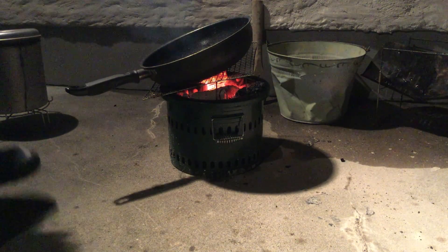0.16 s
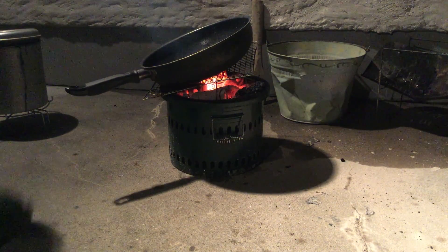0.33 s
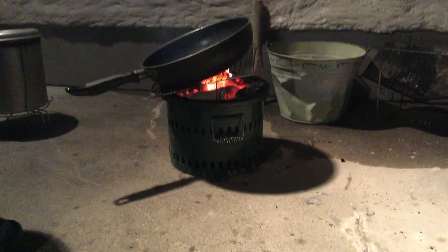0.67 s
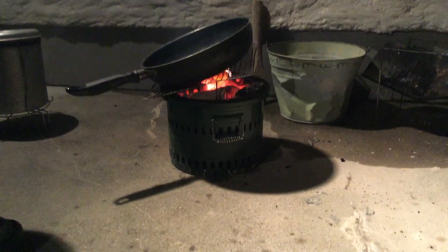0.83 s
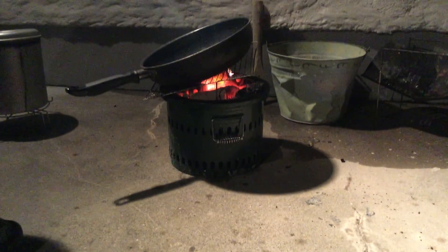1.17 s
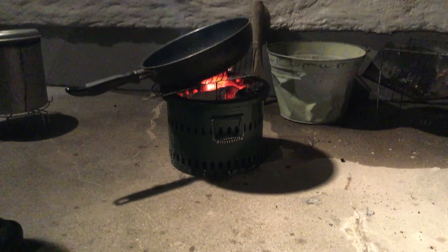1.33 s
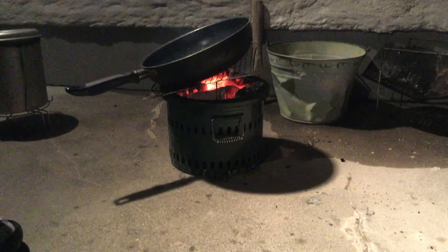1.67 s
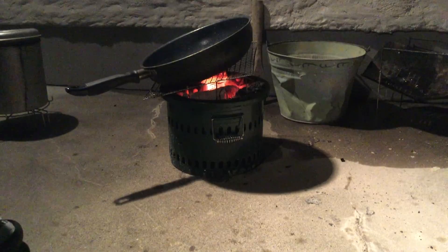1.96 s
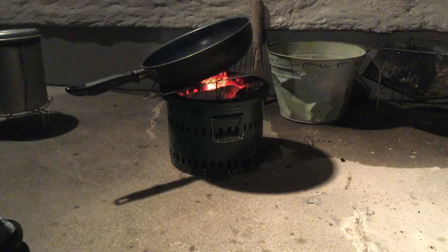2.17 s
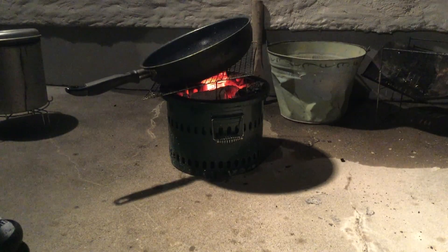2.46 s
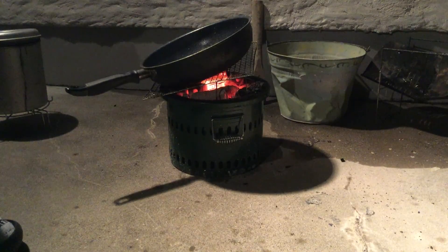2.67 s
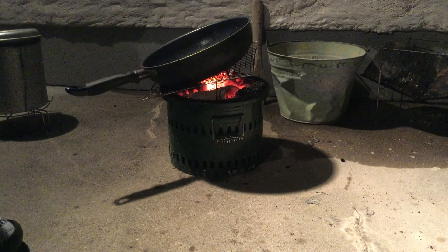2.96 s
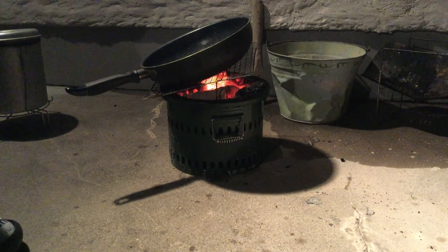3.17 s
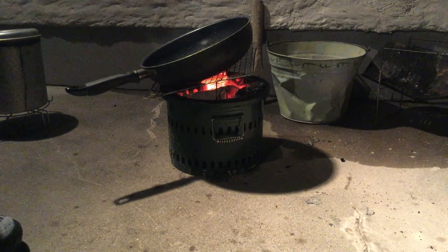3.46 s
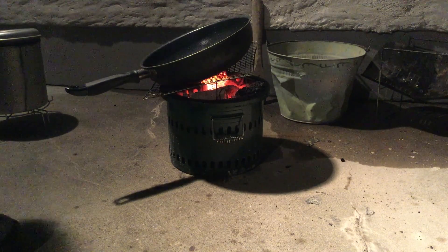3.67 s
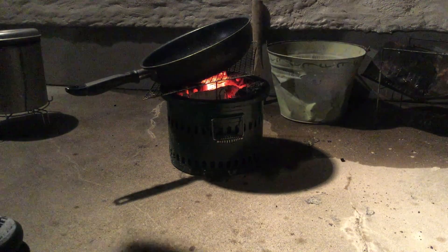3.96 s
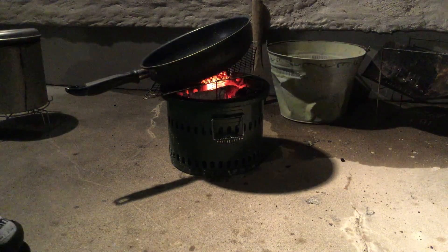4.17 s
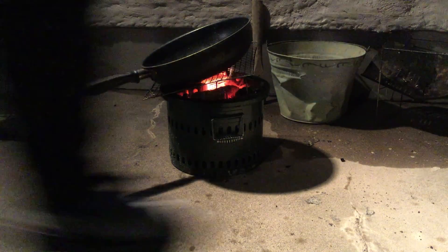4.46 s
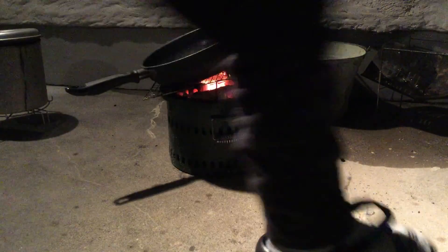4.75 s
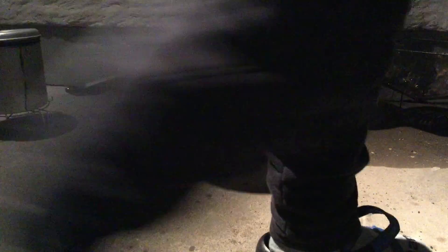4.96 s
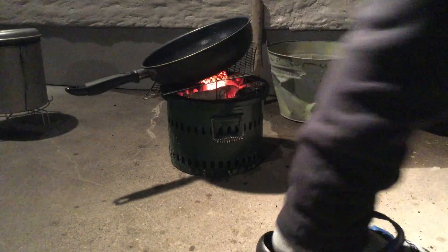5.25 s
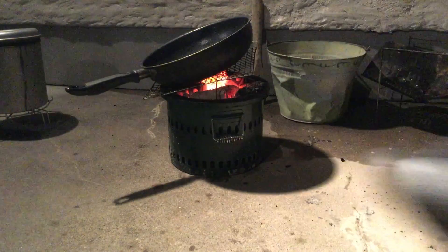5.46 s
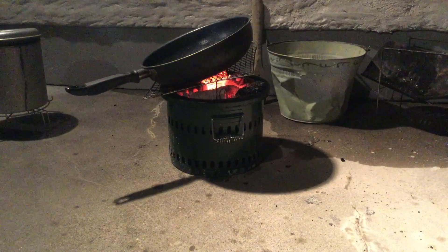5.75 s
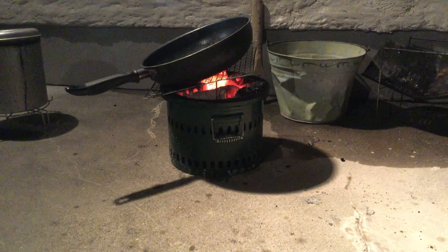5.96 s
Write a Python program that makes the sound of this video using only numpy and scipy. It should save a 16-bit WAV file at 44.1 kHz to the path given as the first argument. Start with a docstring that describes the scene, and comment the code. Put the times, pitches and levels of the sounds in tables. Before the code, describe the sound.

A frying pan grinds twice across a clinking wire grate, and soles scuff and thud on concrete above a low, distant rumble.

```python
"""Wire and pan in a night yard

One microphone in a walled yard, close to the action. Wire clinks and jangles; a metal pan is dragged
twice over it, gripping and slipping, then rocks to rest. There are dull knocks and a quick rattle,
soles scuff on concrete and small things tick and squeak. The walls return a short, dull tail;
far off, a machine hums over a low rumble."""
import sys
import numpy as np
from scipy import signal
from scipy.fft import rfft, irfft
from scipy.io import wavfile
from scipy.ndimage import uniform_filter1d

SR = 44100
rng = np.random.default_rng(int(sys.argv[2]) if len(sys.argv) > 2 else 0)


def generate_wav(sig):
    """Save sig (samples, or channels by samples) to the path in sys.argv[1] as 16-bit PCM at SR."""
    pcm = np.round(np.clip(np.atleast_2d(sig).T, -1, 1) * 32767).astype(np.int16)
    wavfile.write(sys.argv[1], SR, pcm)


N = 269451

# Wire being rubbed: time_s, level_db, rasp_over_ring_db
WIRE_RUBS = [(.23, -70, -17.5), (.27, -51.5, -5.5), (.43, -46, -9), (.6, -54, 2.5), (.705, -43.5, -3.5),
             (.75, -57.5, -1.5), (.85, -59, 3.5), (.93, -77.5, 13), (1.05, -99, 2)]
# Wire being struck: start_s, level_db, t60_s, rasp_over_ring_db
WIRE_CLINKS = [(.244, -44.5, 0.093, -21), (0.2509, -27, 0.06, -3.5), (.3147, -44, 0.081, 1),
               (.4735, -49, 0.19, 2), (0.509, -37, 0.2, 0.5), (0.941, -64.5, 0.27, 8.5)]
# Modes of the wire: pitch_hz, base_width_hz, gain_db
WIRE_MODES = [(2690, 25, 0), (3644, 57, 1.5), (4280, 55, 3.5), (4850, 42, 4), (5340, 160, -0.5),
              (6050, 180, 6), (6980, 27, 1.5), (7440, 19, -7.5), (8920, 300, -13), (8760, 24, -22),
              (9230, 89, -17), (11700, 45, -8), (13310, 40, -18), (15200, 310, -11.5)]
# Broad bands of its rasp: centre_hz, width_hz, gain_db
RASP_BANDS = [(1860, 3100, -4), (3670, 580, 1.5), (4330, 1300, -5.5), (4900, 750, -3), (6090, 320, 8),
              (7100, 2500, -3), (10700, 11000, -8)]

def wire():
    """Near the microphone, slips and blows ring the wire; the rubbing rasps with shifting colour."""
    rub_db, rasp_db = curves(WIRE_RUBS)
    t = np.arange(N) / SR
    rubbing = (t > WIRE_RUBS[0][0]) * (t < WIRE_RUBS[-1][0])
    ring_gain = undb(rub_db + 0.72 * walk(59.5)) * rubbing
    rasp_gain = ring_gain * undb(rasp_db)
    for start, db, t60, share_db in WIRE_CLINKS:
        add(ring_gain, start, undb(db) * fade(t60, 0.0016))
        add(rasp_gain, start, undb(db + share_db) * fade(t60, 0.0017))
    end = int(1.5 * SR)
    slips = grit(3.8)[:end]
    rasp = ring(slips, RASP_BANDS, widen=1, shift_hz=45, shift_db=3.5)
    tones = ring(slips, WIRE_MODES, widen=1.3, shift_hz=70, shift_db=4)
    return np.pad(ring_gain[:end] * tones + rasp_gain[:end] * rasp, (0, N - end))


ROCKS, ROCK_START_S, ROCK_PERIOD_S, ROCK_HOLD_S = 5, 1.8, 0.11, 0.005
ROCK_DB, ROCK_LOSS_DB, ROCK_TREBLE_DB = -60.5, 1.5, -35
GRIP_RISE_S, GRIP_FALL_S, JOLT_DB = 0.003, 0.058, 23
# The pan grips and slides: start_s, hold_s, body_db, treble_over_body_db
PAN_GRIPS = [(1.121, 0.0056, -29, -9.5), (1.128, 0.022, -29.5, -9), (1.172, 0.0071, -30.5, -7.5),
             (1.188, 0.0024, -38.5, -12.5), (1.222, 0.026, -49, -13), (1.345, .015, -52.5, -13),
             (1.38, 0.007, -46, -18), (1.393, 0.016, -45.5, -11), (1.4455, 0.011, -36.5, -16),
             (1.466, 0.0087, -41.5, -8.5), (1.482, 0.006, -43, -10.5)]
# Modes of its bowl: pitch_hz
BOWL_PITCHES = [140, 195, 368, 510, 760, 799, 847, 1005, 1184, 1221, 1284, 1376, 1407, 1562, 1682, 1804,
                1938]
# The same modes, row for row: base_width_hz, gain_db
BOWL_RESONANCES = [(63.2, -13), (56, -8.5), (33.7, -10), (50.3, -11.5), (24.2, -9), (22.5, -5), (22, -7),
                   (25, -12.5), (23.9, -4), (22.5, 1), (23.1, -11.5), (25, -13), (21.9, -8), (39.8, -8.5),
                   (30.7, -16), (30, -13.5), (45, -14.5)]
# High metallic ringing as the pan scrapes over the wire: pitch_hz, width_hz, gain_db
SCRAPE_RINGING = [(2673, 62, 3.5), (3700, 17, -19), (3680, 58, 11), (4220, 58, -2.5), (4330, 53, 0.5),
                  (5090, 50, 0.5), (5984, 75, -0.5), (6130, 52, -10), (7100, 22, -1), (7760, 45.6, 0)]

def pan():
    """Close by, the pan chatters over the wire, each grip driving the modes of both; then it rocks."""
    rocks = [(ROCK_START_S + k * ROCK_PERIOD_S, ROCK_HOLD_S, ROCK_DB - k * ROCK_LOSS_DB, ROCK_TREBLE_DB)
             for k in range(ROCKS)]
    push, scrape, jolts = np.zeros((3, N))
    for start, hold, db, treble_db in PAN_GRIPS + rocks:
        grip = undb(db) * swell(start, GRIP_RISE_S, hold, GRIP_FALL_S)
        push += grip
        scrape += undb(treble_db) * grip
        jolts[int(start * SR)] = undb(db + JOLT_DB)
    span = slice(SR, 3 * SR)
    slips = grit(2.57) * undb(walk(90))
    low, high = (push * slips)[span], (scrape * slips)[span]
    wire_ring = ring(high, WIRE_MODES, widen=1, shift_hz=40, shift_db=3)
    scrape_ring = ring(high, SCRAPE_RINGING, widen=1, shift_hz=35, shift_db=2.5)
    bowl_modes = [(hz, *row) for hz, row in zip(BOWL_PITCHES, BOWL_RESONANCES)]
    bowl = ring(low + jolts[span], bowl_modes, widen=1.7, shift_hz=60, shift_db=1.5)
    hiss = level(band(band(high, 10800, 11050), 9700, 11000), -0.33)
    treble = level(undb(-1) * scrape_ring + undb(-3.5) * wire_ring + hiss, 0)
    grind = level(band(band(low, 1480, 1100), 1400, 1300), -7.5)
    body = bowl + grind + level(band(low, 530, 350), -16)
    out = np.zeros(N)
    out[span] = body * rms(push[span]) + treble * rms(scrape[span])
    return out


CRUNCH_CYCLES = 61  # click cycles per 60 dB of decay: a duller knock crunches longer
# Dull knocks and thuds, including a quick, evenly spaced rattle:
# start_s, level_db, click_hz, thump_over_click_db, thump_hz
DULL_KNOCKS = [(.254, -48, 2070, 4, 204), (.456, -19.5, 1230, -8.5, 181), (0.519, -23, 680, -10.5, 320),
               (0.702, -44, 850, -5, 132), (.808, -41, 860, 0.5, 137), (0.915, -45.5, 725, -6.5, 210),
               (3.644, -26.5, 1800, -4.5, 152), (4.7071, -41.5, 1840, -6, 198),
               (4.7125, -45, 770, 10.5, 215), (4.724, -50, 720, 12.5, 386), (4.81, -40.5, 860, -3.5, 131),
               (4.8549, -26, 1050, -9, 174), (4.913, -49, 830, 10.5, 182), (5.2602, -30.5, 1280, -19, 234),
               (5.28, -51.5, 1690, 8.5, 257), (5.417, -45.5, 630, 1, 188), (5.47, -33.5, 900, -4, 181),
               (5.528, -40.5, 820, 2, 206), (5.582, -47.5, 805, 4, 199), (5.633, -40, 790, -5, 222),
               (5.691, -45.5, 900, 1.5, 248), (5.902, -46.5, 764, 7.5, 255), (5.926, -44, 696, -0.5, 243),
               (5.978, -36, 660, -6, 165)]

def knocks():
    """Nearby knocks: a one-cycle click, a low thump just after it and a dull crunch."""
    out, t = np.zeros(N), np.arange(SR // 4) / SR
    for start, db, hz, thump_db, thump_hz in DULL_KNOCKS:
        noise, grains = rng.standard_normal((2, len(t)))
        cycles = hz * t - 1
        click = np.sin(2 * np.pi * cycles) * np.exp(-(cycles / 0.47) ** 2)
        hollow = band(band(noise, 1.23 * thump_hz, 230), 1.55 * thump_hz, 400)
        thump = (1.6 * np.sin(2 * np.pi * thump_hz * t) + 11.3 * hollow) * fade(0.068, 0.0011)
        crackle = grains * np.abs(grains) * fade(CRUNCH_CYCLES / hz, 0.003)
        crunch = band(band(crackle, 0.7 * hz, 1.1 * hz), hz, 1.2 * hz)
        add(out, start, undb(db) * (1.46 * click + 0.45 * crunch))
        add(out, start + 1.51 / hz, undb(db + thump_db) * thump)
    return out


# Dry ticks: start_s, peak_db, centre_hz, base_width_hz
DRY_TICKS = [(0.03, -52.5, 6140, 9000), (1.124, -34, 11000, 10100), (2.504, -58, 7000, 9000),
             (2.826, -57.5, 5860, 8950), (3.643, -43.5, 4500, 7000), (3.645, -33.5, 1560, 250),
             (3.670, -44, 1560, 300), (3.763, -43, 1990, 1170), (3.853, -47.5, 2260, 1000),
             (4.276, -53.5, 8000, 9000), (4.782, -54.5, 8000, 9000), (4.854, -51, 7000, 10060),
             (4.872, -40, 2100, 1170), (5.068, -50, 8200, 9050), (5.078, -53, 9000, 9000),
             (5.097, -52, 10000, 8000), (5.119, -48, 8900, 9100), (5.199, -65, 9000, 9000),
             (5.211, -58, 9000, 9000), (5.218, -58, 7000, 9000), (5.224, -61, 11000, 6000),
             (5.236, -56, 9000, 9000), (5.249, -41, 7000, 12000), (5.26, -46, 11000, 9000),
             (5.268, -44, 9000, 9000), (5.289, -36.5, 6540, 3000), (5.399, -36.5, 9450, 11000),
             (5.4, -37, 1560, 1160), (5.604, -56.5, 7950, 9050), (5.952, -47, 8000, 9000),
             (5.986, -49.5, 2480, 1500), (5.992, -49, 2400, 1200)]

def ticks():
    """Small things tick close by: a few milliseconds of noise through two resonances."""
    out = np.zeros(N)
    for start, db, hz, width in DRY_TICKS:
        burst = rng.standard_normal(SR // 4) * fade(0.011, 0.0001)
        snap = band(band(burst, hz, width), hz, 1.3 * width)
        add(out, start, undb(db) * snap / np.abs(snap).max())
    return out


RUSTLE_TREBLE_DB = -3.5
# Strokes of sole and cloth: peak_s, rise_s, fall_s, level_db, treble_gain_db
SCUFF_STROKES = [(.035, 0.18, 0.019, -72, 11), (1.78, 0.12, 0.1, -87, -5), (2.511, 0.02, 0.05, -59.5, -8.5),
                 (2.617, 0.023, 0.039, -56.5, -16), (2.832, 0.059, .045, -62, -17),
                 (3.644, 0.0072, 0.0073, -43.5, -5), (3.77, 0.025, 0.07, -68, 3),
                 (3.87, 0.1, 0.061, -61, -2), (4.27, 0.19, 0.15, -65, 0), (4.712, 0.0075, 0.042, -47, 0.5),
                 (4.728, 0.042, 0.042, -72, -31), (4.858, 0.032, 0.058, -49, -3),
                 (5.116, 0.091, 0.03, -63, -2), (5.262, 0.017, 0.092, -56, 14),
                 (5.301, 0.02, 0.059, -47, -5), (5.335, 0.072, 0.024, -49.5, -6),
                 (5.398, 0.006, 0.072, -57, 10), (5.9, 0.015, 0.15, -64.5, 6),
                 (5.99, 0.056, 0.051, -54.5, 1), (6.059, 0.026, 0.02, -58, -24)]
# Midrange bands of a rubbing sole: centre_hz, base_width_hz, gain_db
SOLE_BANDS = [(394, 120, 10), (654, 390, 8), (1450, 2100, 0.5), (2294, 1800, -1.5), (4410, 2000, -14.5)]
# Clothes rustling as someone moves: time_s, level_db
CLOTHES_RUSTLE = [(0, -69), (.2, -71), (1.6, -67.5), (2.7, -85.5), (3.3, -75.5), (3.65, -66), (4.1, -71.5),
                  (4.75, -68), (4.95, -74), (5.5, -71.5), (6.11, -71)]

def scuffs():
    """Sand under rubber and rustling cloth near the microphone: gritty midrange under a fine hiss."""
    middle = ring(grit(3.7), SOLE_BANDS, widen=0.7, shift_hz=60, shift_db=2.5)
    fine_grit = grit(3.9) * undb(0.91 * walk(66))
    hiss = level(band(band(fine_grit, 9500, 12000), 9500, 11000), -11)
    rustle = undb(curves(CLOTHES_RUSTLE)[0]) * (middle + undb(RUSTLE_TREBLE_DB) * hiss)
    return rustle + sum(undb(db) * swell(peak, rise, 0, fall) * (middle + undb(treble_db) * hiss)
                        for peak, rise, fall, db, treble_db in SCUFF_STROKES)


# Tiny squeaks: start_s, level_db, pitch_hz
TINY_SQUEAKS = [(2.4573, -58, 2680), (2.508, -56.5, 2750), (2.5294, -62, 2800), (2.6125, -73, 3040),
                (2.6294, -60.5, 2740), (2.799, -61, 2710), (2.826, -54.5, 2620), (2.838, -62, 2740)]

def squeaks():
    """Faint and near: short tones with a weak octave."""
    out, t = np.zeros(N), np.arange(SR // 4) / SR
    for start, db, hz in TINY_SQUEAKS:
        tone = np.sin(2 * np.pi * hz * t) + undb(-19) * np.sin(4 * np.pi * hz * t)
        add(out, start, undb(db) * tone * fade(0.037, 0.0015))
    return out


def yard_walls(near, t60_s=0.22, level_db=-16):
    """The walls return a dull, diffuse tail, reaching the microphone 6 ms after the direct sound."""
    t = np.arange(SR // 2) / SR
    decay = np.exp(-np.log(1000) * t / t60_s) * (t > 0.006)
    tail = band(rng.standard_normal(len(t)), 400, 1700) * decay
    return signal.fftconvolve(near, tail / np.sqrt(np.sum(tail ** 2)))[:N] * undb(level_db)


# Colour of the night air: frequency_hz, relative_db
RUMBLE_SPECTRUM = [(18, -62.5), (30, -25.5), (69, -5.5), (234, -3.5), (312, -8.5), (346, -14), (384, -11.5),
                   (460, -24.5), (524, -22.5), (1030, -32), (1240, -28), (1370, -35), (1560, -39.5),
                   (2130, -46), (15000, -64)]
# Shape of its swells, stretched about the median: time_s, contour_db
RUMBLE_CONTOUR = [(0.0, -50), (0.66, -46), (1.12, -47), (1.44, -50), (1.84, -46.5), (2.19, -49), (2.4, -47),
                  (2.74, -48), (3.81, -49), (4.12, -51.5), (4.58, -48.5), (4.83, -47.5), (6.11, -47)]

def rumble(level_db=-49, stretch=1.24):
    """Low noise from far beyond the walls, swelling slowly."""
    contour_db = curves(RUMBLE_CONTOUR)[0]
    return coloured(RUMBLE_SPECTRUM) * undb(level_db + stretch * (contour_db - np.median(contour_db)))


# Partials of the motor: shaft_multiple, level_db
MOTOR_PARTIALS = [(2, -57), (3, -54), (6, -58.5), (8, -61.5), (10, -57), (14, -71), (18, -73), (32, -70.5),
                  (34, -80), (40, -78.5)]

def motor(shaft_hz=37.95):
    """A distant machine hums at multiples of its shaft rate, each partial wavering in level."""
    turns = shaft_hz * np.cumsum(1 + 0.0011 * walk(2.7)) / SR
    return sum(undb(db + 0.85 * walk(21)) * np.sin(2 * np.pi * (k * turns + rng.random()))
               for k, db in MOTOR_PARTIALS)


def undb(db):
    return 10 ** (np.asarray(db) / 20)


def rms(x):
    return np.sqrt(np.mean(x ** 2))


def level(x, db):
    return x * undb(db) / rms(x)


def band(x, hz, width_hz):
    """Two-pole resonance, gain 1 at the centre."""
    q = hz / np.clip(width_hz, 1, SR / 2.2)
    return signal.lfilter(*signal.iirpeak(min(hz, SR / 2.2), q, fs=SR), x)


def ring(x, modes, widen, shift_hz, shift_db):
    """Resonances at unit RMS; the moving contact point favours now one mode, now another."""
    return level(sum((-1) ** k * band(x * undb(db + shift_db * walk(shift_hz, len(x))), hz, width * widen)
                     for k, (hz, width, db) in enumerate(modes)), 0)


def curves(rows):
    """Columns joined by lines in time."""
    times, *columns = np.transpose(rows)
    return [np.interp(np.arange(N) / SR, times, column) for column in columns]


def grit(scatter_db):
    """Dense slips of very uneven size."""
    return level(rng.standard_normal(N) * undb(scatter_db * np.minimum(rng.exponential(size=N), 6)), 0)


def walk(rate_hz, size=N):
    """Random levels, each sliding into the next; spread near 1."""
    step = int(SR / rate_hz)
    return uniform_filter1d(np.repeat(rng.standard_normal(size // step + 1), step), step)[:size]


def coloured(points):
    """Unit-RMS noise shaped by (Hz, dB) points."""
    hz, db = np.transpose(points)
    bins_hz = np.maximum(np.arange(N // 2 + 1) * SR / N, 1)
    gain = undb(np.interp(np.log(bins_hz), np.log(hz), db))
    return level(irfft(rfft(rng.standard_normal(N)) * gain, N), 0)


def add(out, start_s, x):
    i = int(start_s * SR)
    out[i:i + len(x)] += x[:N - i]


def fade(t60_s, rise_s):
    """Envelope that rises in about rise_s and falls 60 dB in t60_s."""
    t = np.arange(SR // 4) / SR
    return (1 - np.exp(-t / rise_s)) * np.exp(-np.log(1000) * t / max(t60_s, 0.002))


def swell(peak_s, rise_s, hold_s, fall_s):
    """Gain that climbs 20 dB per rise_s to 1 at peak_s, holds, and sinks 20 dB per fall_s."""
    t = np.arange(N) / SR - peak_s
    return 10 ** -(np.maximum(-t, 0) / rise_s + np.maximum(t - hold_s, 0) / fall_s)


def scene():
    """At the microphone, in mono: the near sources, their return off the walls and the far background."""
    near = wire() + pan() + knocks() + ticks() + squeaks() + scuffs()
    return (near + yard_walls(near) + rumble() + motor())[None]


def record(dry):
    """The recorder cuts the top steeply above 15.4 kHz."""
    return signal.sosfilt(signal.ellip(10, 0.2, 70, 15400, fs=SR, output="sos"), dry)


dry = scene()
out = record(dry)
generate_wav(out)
```